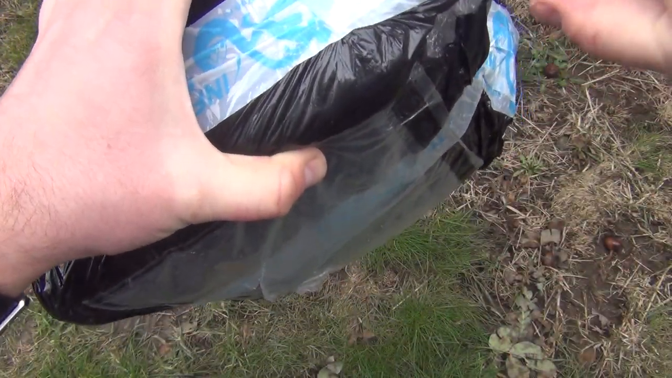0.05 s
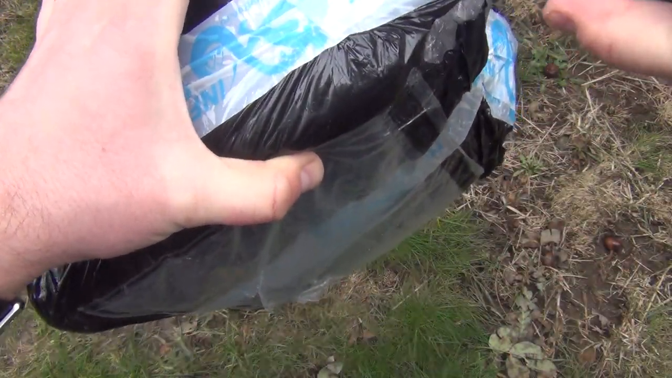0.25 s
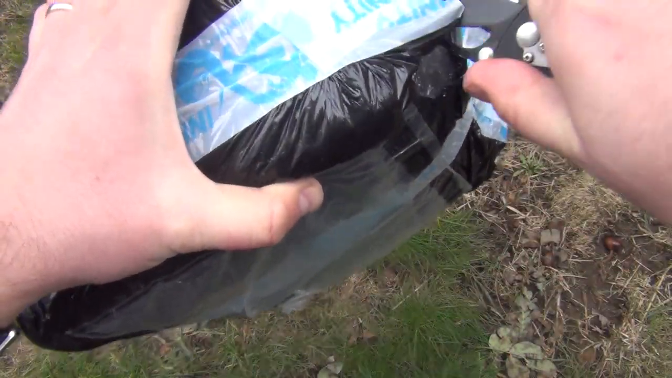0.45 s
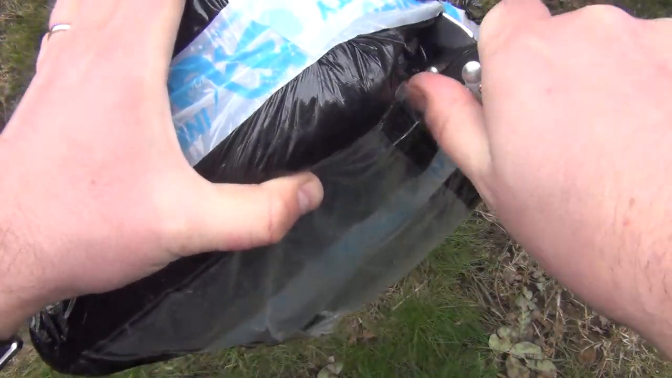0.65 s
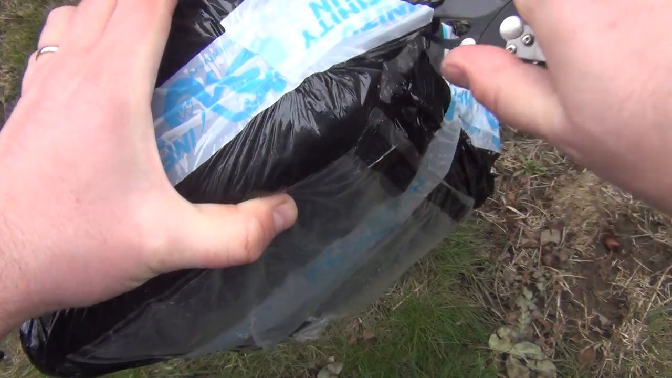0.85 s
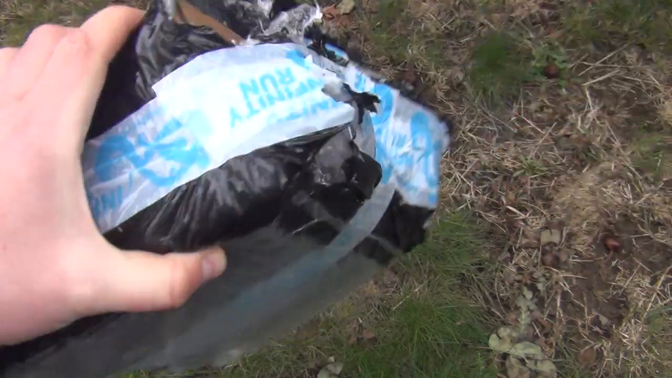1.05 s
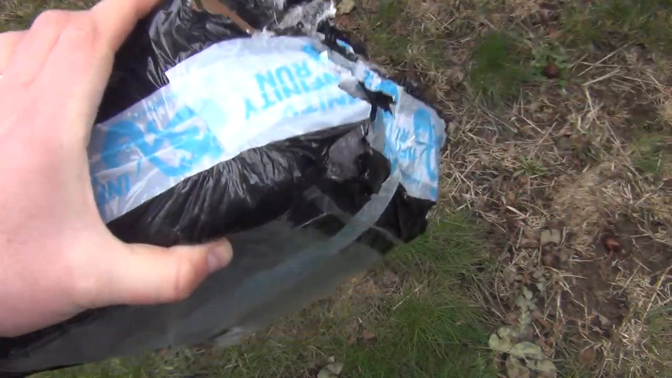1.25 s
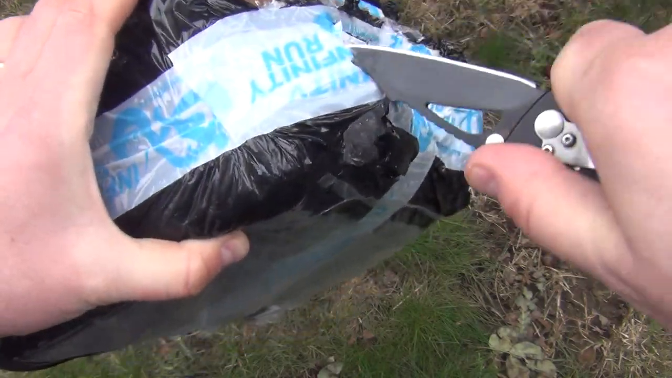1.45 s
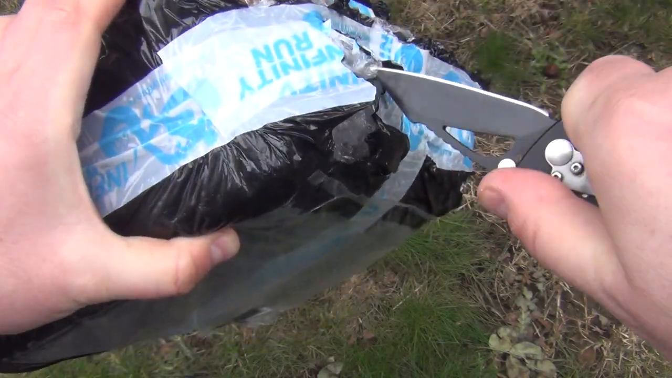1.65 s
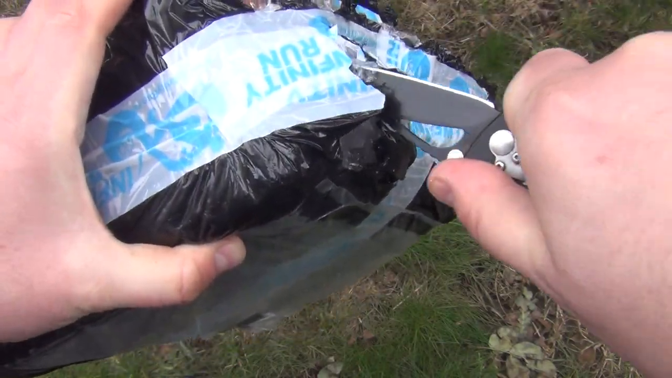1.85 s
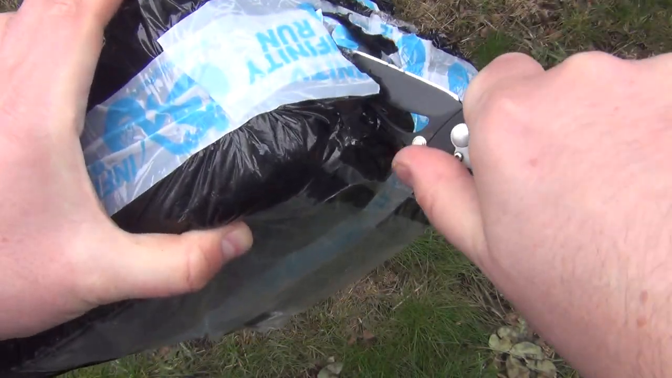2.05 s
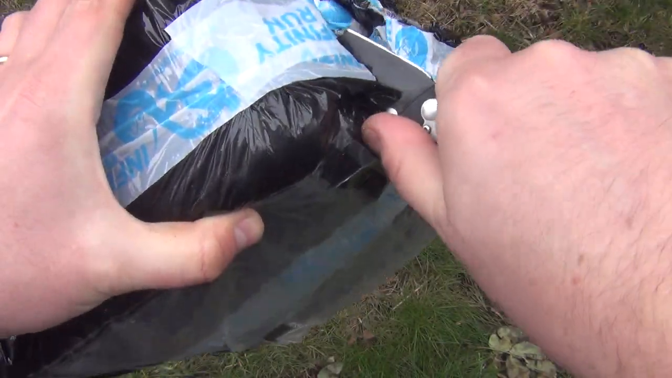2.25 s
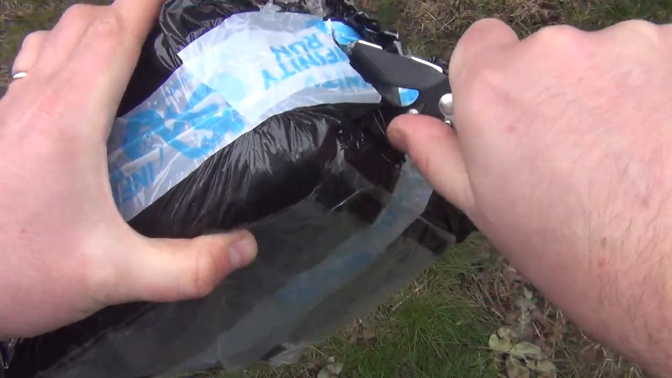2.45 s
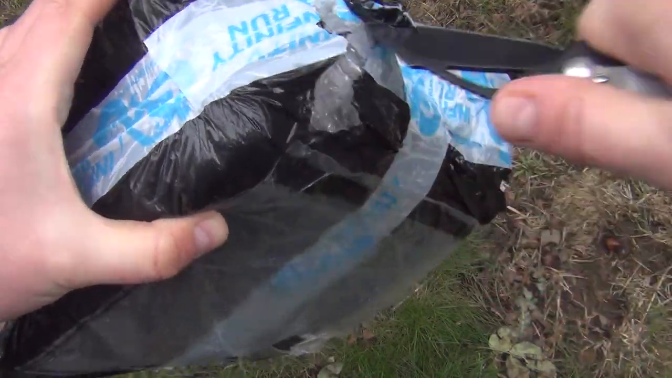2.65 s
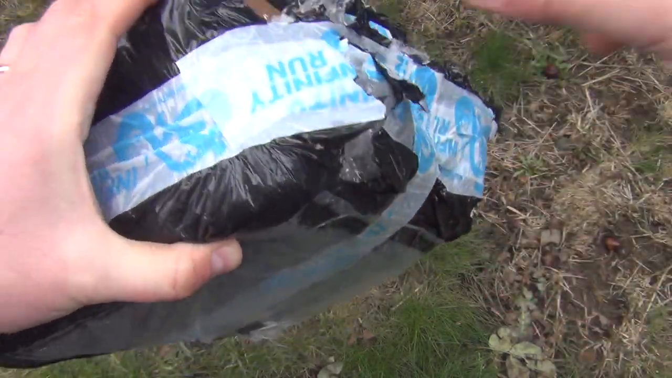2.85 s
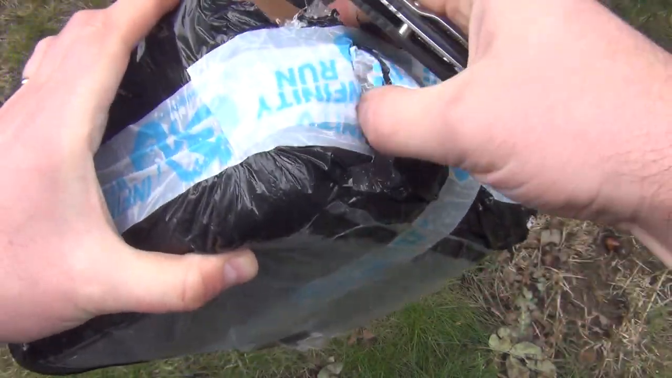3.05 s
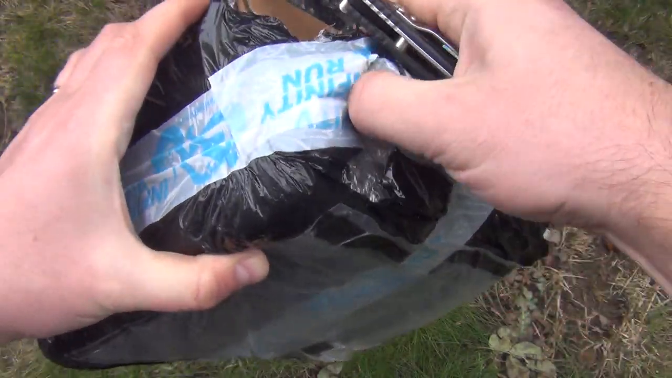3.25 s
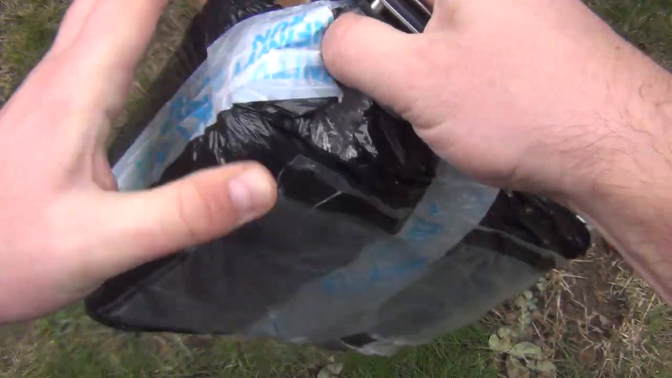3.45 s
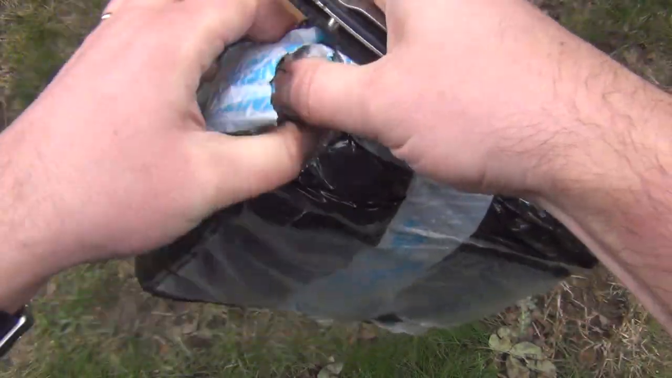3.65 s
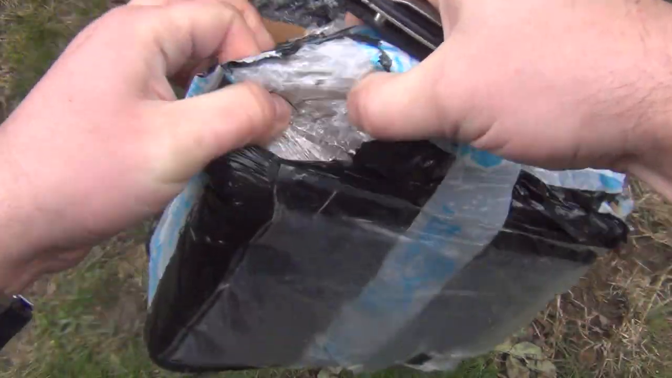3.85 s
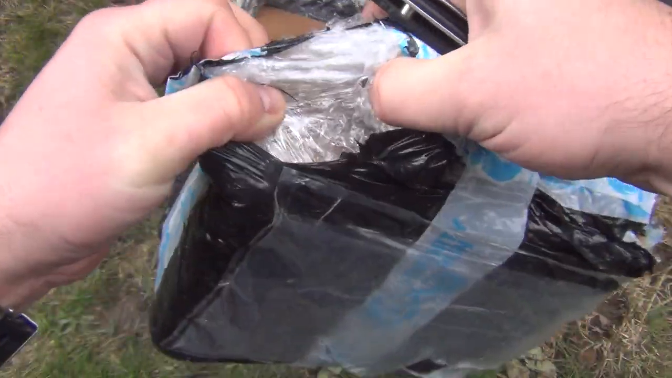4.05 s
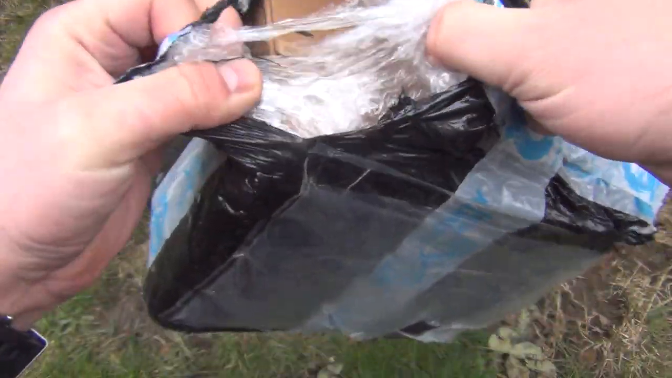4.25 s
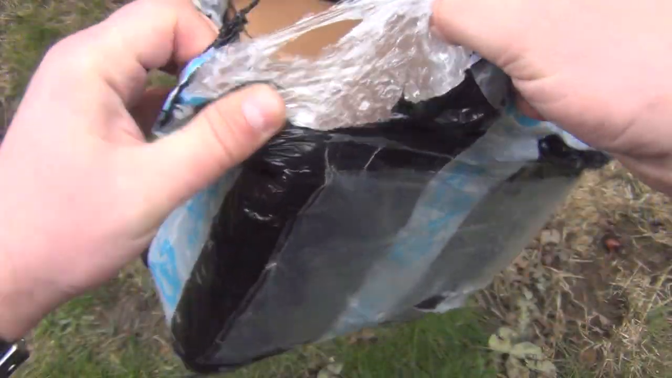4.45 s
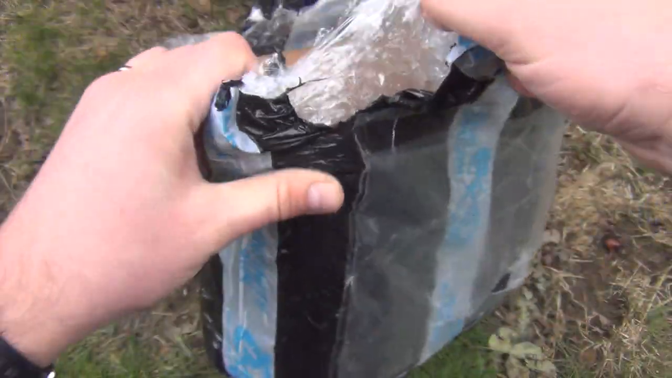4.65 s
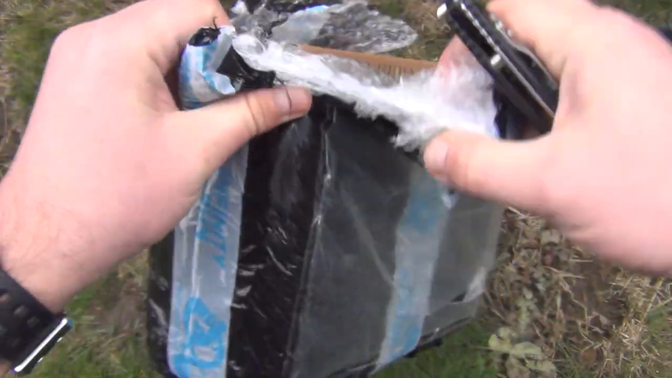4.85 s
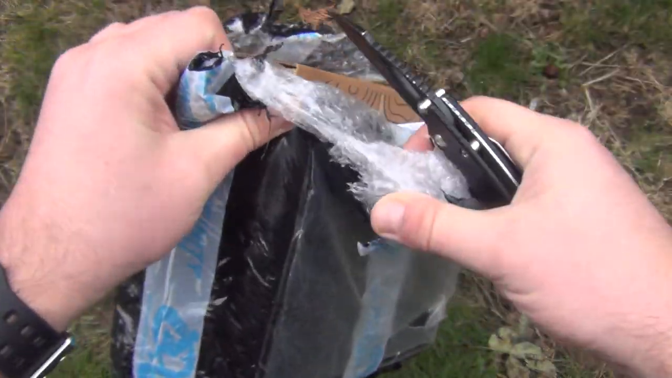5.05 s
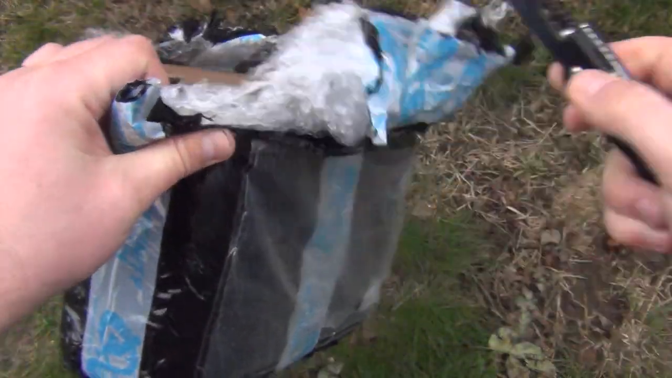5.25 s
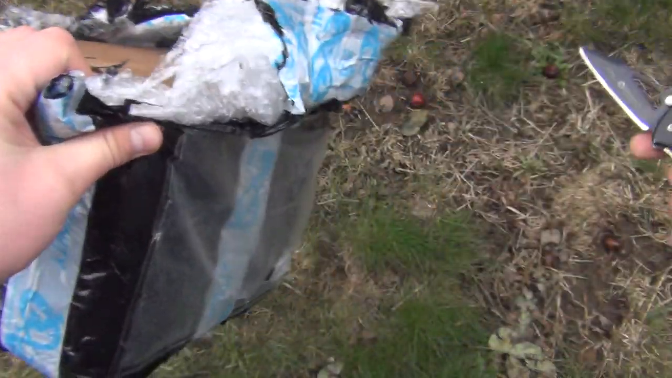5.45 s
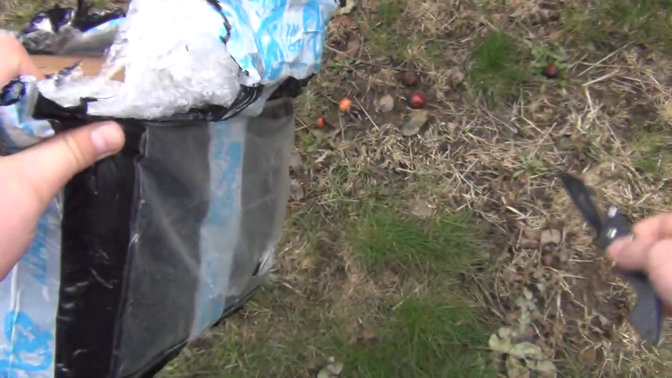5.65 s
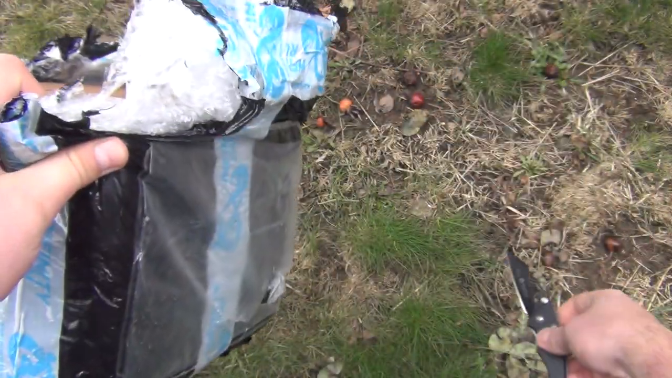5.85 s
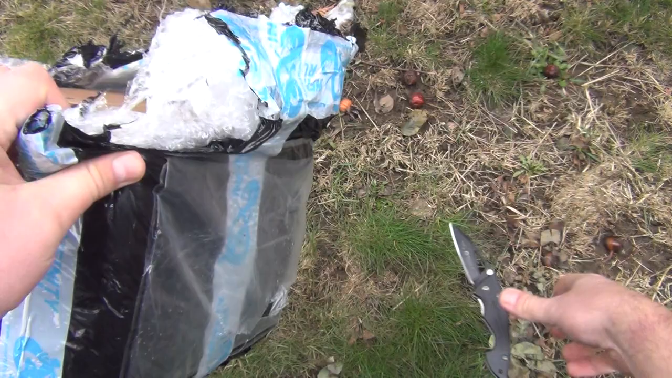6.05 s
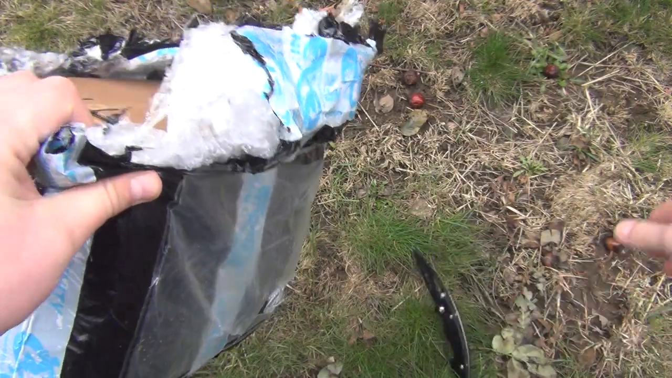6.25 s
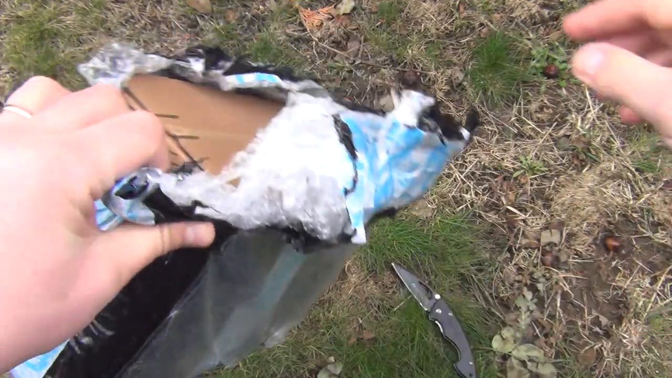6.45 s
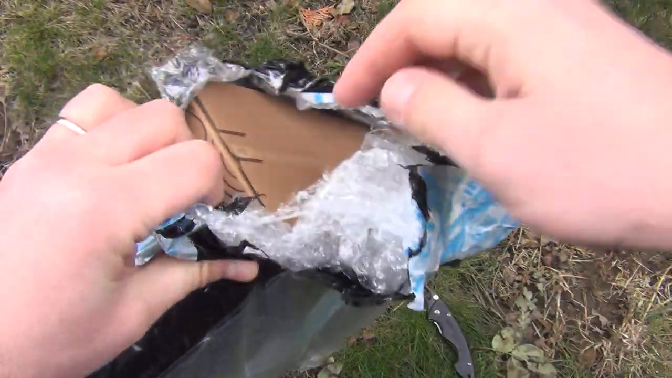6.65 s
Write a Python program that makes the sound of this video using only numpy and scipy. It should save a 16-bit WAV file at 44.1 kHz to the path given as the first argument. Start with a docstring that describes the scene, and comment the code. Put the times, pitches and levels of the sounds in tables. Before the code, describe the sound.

Bright crinkling of film with sharp snaps, a few hollow cardboard knocks and soft thumps, dying to sparse tiny ticks in quiet outdoor air.

```python
"""Unwrapping a taped cardboard parcel

A cardboard parcel in plastic bags and packing tape is cut and pulled open by hand outdoors, close by.
Swarms of tiny random buckles form the crinkle, denser the harder the film is pulled; single folds snap
as filtered noise bursts, and the box knocks as decaying modes when the tape gives way.
Filtered noise gives the quiet air, and wavering sines the faint low hum and the camera's focus motor."""
import sys
import numpy as np
from scipy import signal
from scipy.fft import rfft, irfft, next_fast_len
from scipy.io import wavfile
from scipy.ndimage import uniform_filter1d, map_coordinates

SR = 44100
rng = np.random.default_rng(int(sys.argv[2]) if len(sys.argv) > 2 else 0)


def persist_wave(psi):
    """Save psi, clipped to +-1, as 16-bit WAV."""
    counts = np.round(np.clip(psi, -1, 1) * 32767).astype(np.int16)
    wavfile.write(sys.argv[1], SR, np.atleast_2d(counts).T)


N = 295911

# colour of the crinkling inner wrap: (f/Hz, spectral density level/dB per Hz, relative)
FILM_COLOUR = [(88, -51), (150, -27), (259, -7.5), (484, -12.5), (637, -4.5), (888, -4.5), (1690, -0.5),
               (2870, 0.5), (3420, 2), (5150, 0), (8400, 0), (12700, -9), (14800, -13), (16000, -23)]


def amp(db):
    """Level: an amplitude ratio is ten to the power of dB/20."""
    return 10 ** (np.asarray(db) / 20)


def unit(x):
    """Normalisation: a signal divided by its rms has rms 1."""
    return x / np.sqrt(np.mean(x ** 2) + 1e-20)


def along(points, hz):
    """Logarithmic pitch scale: (f/Hz, value) points are interpolated along log frequency."""
    f, v = np.transpose(points)
    return np.interp(np.log(hz + 1), np.log(f + 1), v)


def wobble(rate):
    """Slow random modulation: a smooth curve through rate normal random knots a second."""
    knots = rng.standard_normal(int(N * rate / SR) + 4)
    return map_coordinates(knots, [np.arange(N) * rate / SR])


def coloured(x, gain):
    """Minimum-phase filtering: a causal filter of the given gain keeps the fronts of clicks sharp."""
    n = x.shape[-1]
    m = 2 * next_fast_len(n // 2 + 4096)
    cepstrum = irfft(np.log(np.maximum(gain(np.fft.rfftfreq(m, 1 / SR)), 1e-5)), m)
    # folding the cepstrum onto positive times makes the filter causal
    cepstrum[1:m // 2] *= 2
    cepstrum[m // 2 + 1:] = 0
    return irfft(rfft(x, m) * np.exp(rfft(cepstrum)), m)[..., :n]


def resonance(hz, centre, q):
    """Simple resonance: the response falls off on both sides of the centre, faster for a higher q."""
    return 1 / np.sqrt(1 + (q * (hz / centre - centre / (hz + 1))) ** 2)


def add(track, s, sound):
    """Superposition: a sound adds linearly to the track from time s."""
    start = max(round(s * SR), 0)
    part = track[start:start + len(sound)]
    part += sound[:len(part)]


def bursts(count, crack_s, flutter_s, flutter_db):
    """Impulsive excitation: each row is an abrupt noise crack, then a brief flutter of the sheet."""
    t = np.arange(SR // 160) / SR
    shape = np.exp(-t / crack_s) + amp(flutter_db) * np.exp(-t / flutter_s)
    return shape * rng.standard_normal((count, len(t)))


def outdoors(hum_hz, hum_db, air_db):
    """Broadband and tonal background: quiet air is shaped noise, the low hum a wavering sine."""
    # outdoor air: (f/Hz, spectral density level/dB per Hz, relative)
    air_colour = [(20, -12), (60, -5), (200, -6), (400, -14.5), (700, -13.5), (1000, -12.5), (1600, -16),
                  (16000, -26.5)]
    air = unit(coloured(rng.standard_normal(N), lambda hz: amp(along(air_colour, hz))))
    hum_phase = 2 * np.pi * np.cumsum(hum_hz + 3.13 * wobble(7.6)) / SR
    hum = np.sqrt(2) * np.sin(hum_phase)
    return amp(air_db + 0.36 * wobble(2.7)) * air + amp(hum_db + 0.83 * wobble(3.75)) * hum


def draught():
    """Low-frequency noise: a broad resonance shapes a faint draught whose level wanders."""
    rumble = coloured(rng.standard_normal(N), lambda hz: resonance(hz, centre=35, q=0.2) ** 2)
    return amp(-70.0 + 5.1 * wobble(4.33)) * unit(rumble)


def strokes():
    """Energy addition: the powers of strokes sum over a floor; gives level and tape and thin shares in dB."""
    # cuts, tugs and touches: (start t/s, length t/s, level/dB, swell from start to end/dB,
    # stiff tape re level/dB, thin film re level/dB), the shares before trims in crinkle()
    stroke_table = [(0, 0.018, -35, -1, -0.5, -4), (0.04, 0.036, -38.5, -1, -8.5, -1),
                    (0.114, 0.044, -36, -2, -12, -1), (.198, 0.093, -41, 2, -6, 3),
                    (0.281, 0.27, -31, -8, -6, -1.5), (0.534, .15, -29.5, 4, -8.5, -5.5),
                    (.685, 0.072, -34, -5, -4.5, -1), (0.754, .17, -29, 2, -6.5, 0.5),
                    (.928, 0.043, -32, 3, -5.5, -0.5), (0.986, .11, -40, -3, 0.5, 3),
                    (1.092, 0.024, -34, 0, -3, 1), (1.154, 0.059, -39, -2, -2, -1),
                    (1.24, 0.14, -49, -1, -7.5, -1), (1.5, 0.16, -41, 1, -4, 2),
                    (1.751, .11, -54, 5.5, -2, -1), (1.858, .12, -33.5, 1, -6.5, -1.5),
                    (1.992, .14, -32.5, 4, -8.5, -4), (2.147, 0.19, -29.5, 5, -5.5, -3.5),
                    (2.345, 0.18, -30.5, 1, -7, -1), (2.519, 0.075, -30, 1, -1.5, -2),
                    (2.609, 0.098, -32.5, -11, -6.5, 1), (2.763, 0.076, -47, 3, -6, 0),
                    (2.971, 0.11, -33, -8, -5.5, -2.5), (3.08, .27, -30.5, 4, -4.5, -1.5),
                    (3.353, 0.099, -32, 1, -3, -2.5), (3.464, .18, -30.5, 4, -6, -1),
                    (3.651, .11, -30.5, 1, -6, 0), (3.763, 0.15, -28, 1, -4, -1),
                    (3.927, .11, -31, 2, -4.5, 0), (4.047, 0.2, -29.5, -1, -4.5, 0.5),
                    (4.253, 0.082, -28.5, -3, -5.5, -2.5), (4.342, 0.21, -32.5, 7, -4.5, 1),
                    (4.541, 0.21, -30.5, -2, -7.5, -2), (4.744, 0.068, -29.5, 4, -7, -1),
                    (4.82, 0.21, -32, -3, -6, -1), (5.045, 0.066, -38, 1, -7, 2),
                    (5.103, 0.11, -30, 4, -6.5, -6), (5.229, 0.41, -43.5, -23.5, -7, 0.5),
                    (5.76, 0.21, -49.5, -0.5, -5.5, -1), (6.162, 0.052, -48, 3.5, -17, -1),
                    (6.359, 0.12, -47, 12, -6.5, 0.5), (6.505, 0.18, -45, 2.5, -7.5, 1),
                    (6.681, 0.018, -30.5, -2, -6.5, 2)]
    # the held parcel never stops creaking: one level/dB each for whole, stiff tape, thin film
    rest_db = [-58.5, -65.5, -56]
    attack_s, release_s = .018, .027  # the film tightens, and relaxes when let go
    thin_fall = 0.045  # dB less of the thin film for each dB that a stroke grows

    power = np.ones((3, N)) * amp(rest_db)[:, None] ** 2
    for start, length, db, swell_db, tape_db, thin_db in stroke_table:
        age = np.arange(int((length + 6 * release_s) * SR)) / SR
        growth_db = swell_db * (np.minimum(age / length, 1) - .5)
        attack = np.sin(np.pi / 2 * np.minimum(age / attack_s, 1)) ** 2
        release = np.exp(-np.maximum(age - length, 0) / release_s)
        envelope = amp(db + growth_db) * attack * release
        for track, share_db in zip(power, (0, tape_db, thin_db - thin_fall * growth_db)):
            add(track, start, (envelope * amp(share_db)) ** 2)

    whole, tape, thin = 10 * np.log10(power)
    # the film catches and slips, and the crackle wanders between tape and film
    level_db = whole + 0.65 * wobble(30)
    tape_share_db = tape - whole + 1.0 * wobble(17)
    thin_share_db = thin - whole + 0.5 * wobble(17)
    return level_db, tape_share_db, thin_share_db


def swarm(rate, spread_db, flutter_db):
    """Poisson-like shot noise: random buckles, rate a second, each of its own size and pitch; rms 1."""
    low_hz, high_hz, ring_s = 900, 13000, .0005  # pitch range and ring decay of a buckling fold
    times = np.flatnonzero(rng.random(N) < rate / SR)
    sizes = amp(spread_db * np.minimum(rng.standard_normal((len(times), 1)), 1))
    flutter_each_db = np.broadcast_to(flutter_db, N)[times, None]
    grains = bursts(len(times), crack_s=0.00024, flutter_s=0.0015, flutter_db=flutter_each_db)
    t = np.arange(grains.shape[1]) / SR
    pitch = np.exp(rng.uniform(np.log(low_hz), np.log(high_hz), (len(times), 1)))
    ring_gain = np.sqrt(pitch / ((low_hz + high_hz) / 2))
    ring = ring_gain * np.sin(2 * np.pi * pitch * t) * np.exp(-t / ring_s)
    # sum the overlapping buckles sample by sample
    places = times[:, None] + np.arange(len(t))
    return unit(np.bincount(places.ravel(), (sizes * (grains + ring)).ravel(), N)[:N])


def creases(effort, sharp_db, slide_db, even_s):
    """Buckling instability: a dense bed of tiny buckles, with fewer sharp clicks that come in runs."""
    # a light touch gives dry ticks; a hard pull sets the sheet fluttering
    fine = swarm(3200 * effort, spread_db=1, flutter_db=-6 + 8 * np.log10(effort))
    runs = amp(2.5 * wobble(30) - .2 * sharp_db)
    sharp = swarm(230 * runs * effort ** .6, spread_db=2.8, flutter_db=-17)
    # a very slight emphasis around 1700 Hz for all the sharp clicks
    sharp = unit(coloured(sharp, lambda hz: 1 + 0.027 * resonance(hz, centre=1700, q=1.0)))
    # sliding film hisses softly between the clicks
    slide = rng.standard_normal(N) * np.sqrt(effort)
    total = fine + amp(sharp_db) * sharp + amp(slide_db) * slide
    # the hands feed in energy steadily, however it is shared among the creases
    span = max(int(even_s * SR), 2)
    power = uniform_filter1d(uniform_filter1d(total ** 2, span), span)
    return total / np.sqrt(np.abs(power) + 1e-12)


def facets(x, depth_db, life_s, width_hz):
    """Plate modes: flat facets between creases ring at pitches that shift as the sheet refolds."""
    hz, t, z = signal.stft(x, SR, nperseg=256)
    where = np.meshgrid(hz / width_hz, t / life_s, indexing="ij")
    field = map_coordinates(rng.standard_normal((64, 1024)), where, mode="wrap")
    # the highest modes crowd together and even out
    depth = depth_db / (1 + hz[:, None] / 6000)
    return signal.istft(z * amp(depth * field), SR, nperseg=256)[1][:N]


def crinkle():
    """Radiation by bands: harder pulling buckles more creases in the stiff tape, bag and thin film."""
    # outer bag under the knife: (f/Hz, spectral density level/dB per Hz, relative)
    bag_colour = [(88, -38), (150, -12), (354, -7.5), (448, -13), (649, -6.5), (1760, -0.5), (2100, -2.5),
                  (3100, 1.5), (7320, -1), (12900, -10.5), (16000, -17)]
    # spells when taut film tears in separate steps: (start t/s, end t/s)
    taut_spells = [(2.34, 2.43), (3.43, 3.51), (3.92, 4.12), (4.2, 4.4)]
    unwrap_s = 2.9  # the outer bag sounds before this time, the inner wrap pulled by hand after it

    level_db, tape_db, thin_db = strokes()
    effort = np.clip(amp(.8 * (level_db + 34)), .07, 1.5)
    t = np.arange(N) / SR
    taut = sum((t > start) & (t < end) for start, end in taut_spells)
    # the sharp clicks of taut film stand out over the rustle
    clicks = creases(effort, sharp_db=4.5 * taut, slide_db=-12, even_s=.055)
    clicks = facets(clicks, depth_db=3, life_s=.02, width_hz=300)
    outer = coloured(clicks, lambda hz: amp(along(bag_colour, hz)))
    inner = coloured(clicks, lambda hz: amp(along(FILM_COLOUR, hz)))
    wrap = np.where(t < unwrap_s, unit(outer), unit(inner))

    # low, middle and high bands stand for tape, bag and thin film
    m = next_fast_len(N + SR // 10)
    hz, spectrum = np.fft.rfftfreq(m, 1 / SR), rfft(wrap, m)
    above = lambda edge_hz: 1 - 1 / (1 + (hz / edge_hz) ** 6)
    part = lambda share: unit(irfft(spectrum * share, m)[:N])
    over_tape, over_bag = above(edge_hz=2460), above(edge_hz=10270)
    tape = amp(tape_db - 3.0) * part(1 - over_tape)
    bag = amp(-4.0) * part(over_tape - over_bag)
    thin = amp(thin_db - 3.5) * part(over_bag)
    return amp(level_db) * (tape + bag + thin)


def snaps():
    """Snap-through buckling: a taut fold flips over with one sharp tick at its own pitch."""
    # single folds: (t/s, peak level before the common trim/dB, pitch f/Hz)
    snap_table = [(0.011, -17.5, 7750), (0.0777, -16.5, 9900), (0.1264, -24, 7130), (0.142, -38, 10300),
                  (0.6573, -6, 3160), (0.9395, -13, 2946), (1.1674, -16, 5040), (1.3023, -25, 7750),
                  (1.4173, -24.5, 7540), (1.6445, -16, 7010), (1.658, -17, 9380), (2.0022, -8, 6670),
                  (2.0392, -10, 3530), (2.982, -28, 9420), (3.0936, -12, 8520), (3.4306, -16, 3900),
                  (3.4855, -22, 8000), (3.7948, -10, 2280), (4.0703, -14, 3370), (4.2434, -15, 6440),
                  (4.2618, -7.5, 3296), (4.2742, -8.5, 2890), (4.2926, -9, 3082), (4.3345, -13, 9000),
                  (4.3798, -13, 4227), (5.2103, -11.5, 4136), (5.1207, -17, 8450), (5.3472, -11, 3700),
                  (5.444, -22.5, 8000), (5.8094, -17, 8890), (5.84, -24, 3780), (5.9805, -23.5, 3830),
                  (6.0642, -18.5, 5250), (6.0868, -29.5, 3890), (6.1385, -16.5, 9550),
                  (6.1835, -24.5, 4080), (6.2205, -15.5, 7330), (6.3041, -25, 4020), (6.4296, -15.5, 3983),
                  (6.5556, -14.5, 9540), (6.5783, -23, 4455), (6.5996, -11.5, 3708)]
    trim_db = -2
    track = np.zeros(N)
    cracks = bursts(len(snap_table), crack_s=.0004, flutter_s=.002, flutter_db=-17)
    soft_top = lambda hz: 1 / (1 + (hz / 14000) ** 10)
    for (s, db, pitch), crack in zip(snap_table, cracks):
        tick = coloured(crack, lambda hz: resonance(hz, pitch, q=0.9) * soft_top(hz))
        add(track, s, amp(db + trim_db) * tick / np.abs(tick).max())
    return track


def focus_motor(pitch_hz):
    """Tonal machine noise: the motor whines as a faint sine of unsteady pitch and level."""
    # motor runs: (start t/s, end t/s, amplitude level before its wavering/dB)
    run_table = [(0.247, 0.746, -60.5), (1.242, 3.099, -60.5), (6.35, 6.662, -62)]
    t = np.arange(N) / SR
    running = sum(amp(db) * np.clip(np.minimum(t - start, end - t) / 0.018, 0, 1)
                  for start, end, db in run_table)
    phase = 2 * np.pi * np.cumsum(pitch_hz + 9 * wobble(70)) / SR
    return running * amp(4.3 * wobble(11.1)) * np.sin(phase)


def knocks():
    """Modal excitation: tape gives way and slaps the cardboard; the hollow box swells a moment later."""
    # tugs and blows: (t/s, slap level before its crack is added/dB, slap pitch f/Hz, slap decay t/s,
    # hollow boom peak level/dB)
    knock_table = [(0.872, -18.5, 1023, 0.002, -58), (0.975, -13.5, 921, 0.0061, -23),
                   (1.029, -14, 1250, 0.0028, -22), (1.085, -22.5, 882, 0.0028, -27),
                   (1.113, -31, 1700, .005, -29), (1.137, -20, 1761, 0.0034, -31),
                   (1.6157, -22, 1976, 0.0012, -30), (2.002, -18, 2181, 0.0018, -35),
                   (2.04, -20.5, 1479, .0026, -36.5), (2.658, -17.5, 1477, 0.0027, -35.5),
                   (3.0945, -21, 1348, 0.0011, -32), (3.101, -29, 1300, 0.0017, -38),
                   (3.392, -37, 660, 0.015, -33), (3.422, -26, 801.6, 0.0058, -32.5),
                   (3.4303, -24.5, 1398, .0012, -40), (6.599, -26.5, 2300, 0.0035, -48),
                   (6.696, -22, 1893, 0.0015, -36)]
    # modes of the box, before random spread: (f/Hz, relative level/dB, t60/s)
    box_modes = [(192, 2, 0.042), (264, -2.5, 0.095), (347, 3, 0.051), (432, -8, 0.16), (710, -11.5, 0.06),
                 (750, -1, 0.017)]
    track, t = np.zeros(N), np.arange(SR // 6) / SR
    for s, db, pitch, decay_s, boom_db in knock_table:
        contact = (1 - np.exp(-t / .0003)) * (np.exp(-t / decay_s) + amp(-21) * np.exp(-t / .014))
        # the panel adds body around 684 Hz to the slap's own pitch
        panel = lambda hz: (resonance(hz, pitch, q=1.0) ** 2
                            + amp(-0.5) * resonance(hz, centre=684, q=2.8) ** 2)
        slap = coloured(contact * rng.standard_normal(len(t)), panel)

        boom = np.zeros(len(t))
        for hz, level, t60 in box_modes:
            decay = amp(level + rng.normal(0, 4.3) - 60 * t / t60)
            cycles = hz * rng.normal(1, 0.045) * t + rng.random()
            boom += decay * np.sin(2 * np.pi * cycles)
        boom *= 1 - np.exp(-t / 0.0017)

        # the tape itself cracks, around 2800 Hz
        crack = np.exp(-t / .0017) * rng.standard_normal(len(t))
        crack = coloured(crack, lambda hz: resonance(hz, 2800, q=1.6))
        slap = slap / np.abs(slap).max() + amp(-4.5) * crack / np.abs(crack).max()
        add(track, s, amp(db) * slap + amp(boom_db) * boom / np.abs(boom).max())
    return track


def thumps():
    """Microphone overload: a sharp crack knocks the level, heard as a low thump; gives mid and side."""
    # low thumps, uneven between the channels: (t/s, mid level/dB, side level/dB)
    thump_table = [(2.388, -19.5, -37), (2.514, -30, -53), (3.61, -25, -43), (3.773, -26.5, -25),
                   (4.128, -28.5, -48), (4.195, -26.5, -55), (4.329, -31, -38), (4.379, -32, -27.5)]
    mid, side, t = np.zeros(N), np.zeros(N), np.arange(SR // 10) / SR
    # a quick step that swings back through zero
    u = t / 0.0049
    thump = (1 - u) * np.exp(-u) * (1 - np.exp(-t / 0.00036))
    cracks = bursts(len(thump_table), crack_s=.0004, flutter_s=.002, flutter_db=-20)
    cracks = coloured(cracks, lambda hz: amp(along(FILM_COLOUR, hz)))
    for (s, mid_db, side_db), crack in zip(thump_table, cracks):
        add(mid, s, amp(mid_db) * thump)
        add(mid, s, amp(-23.5) * crack / np.abs(crack).max())
        add(side, s, amp(side_db) * thump)
    return mid, side


def handling(pitch_hz):
    """Damped random vibration: a soft low rumble swells and fades each time the grip shifts."""
    # shifts of the grip: (t/s, rumble level/dB, fade t/s)
    grip_table = [(2.808, -39, 0.058), (6.22, -48, 0.25)]
    strength, t = np.zeros(N), np.arange(SR) / SR
    for s, db, fade_s in grip_table:
        add(strength, s, amp(db) * (1 - np.exp(-t / 0.0017)) * np.exp(-t / fade_s))
    rumble = coloured(rng.standard_normal(N), lambda hz: resonance(hz, pitch_hz, q=0.96) ** 2)
    return strength * unit(rumble)


def scene():
    """Mid-side superposition: the parcel lies straight ahead; a faint side signal gives slight width."""
    # stereo width of the sound, nearly mono around 2 kHz: (f/Hz, side level re mid/dB)
    width = [(100, -30), (600, -20), (2000, -86), (4400, -54), (8100, -13), (13000, -36)]
    thump_mid, thump_side = thumps()
    motor = focus_motor(pitch_hz=508)
    near = crinkle() + snaps() + knocks() + handling(pitch_hz=84.4)
    mid = near + outdoors(hum_hz=57.3, hum_db=-59.5, air_db=-52.0)
    # this side signal is a quarter cycle out of step, so it leaves both channels equally loud
    side_gain = amp(along(width, np.fft.rfftfreq(2 * N, 1 / SR)))
    side = irfft(1j * rfft(mid, 2 * N) * side_gain)[:N]
    mid = mid + thump_mid + motor
    side = side + thump_side + draught() + amp(-12.0) * motor
    return np.array([mid + side, mid - side])


def record(dry):
    """Saturation and band limiting: the tallest clicks are rounded off, and nothing passes above top_hz."""
    top_hz = 16000
    rounded = dry / (1 + (dry / .38) ** 4) ** .25
    m = next_fast_len(N + SR // 10)
    passed = np.fft.rfftfreq(m, 1 / SR) < top_hz
    return irfft(rfft(rounded, m) * passed, m)[:, :N]


dry = scene()
out = record(dry)
persist_wave(out)
```